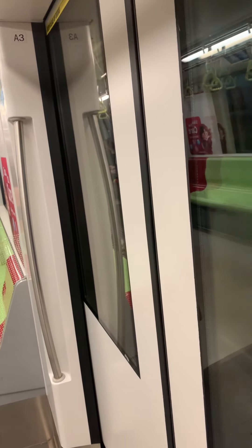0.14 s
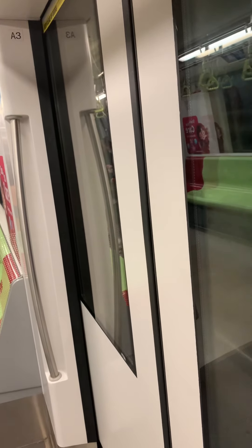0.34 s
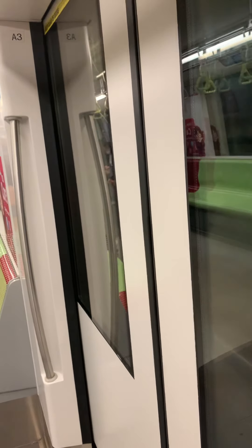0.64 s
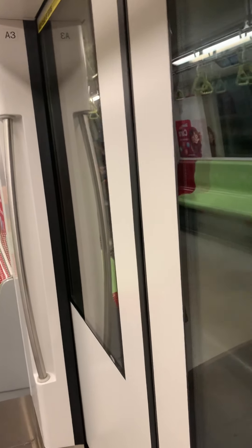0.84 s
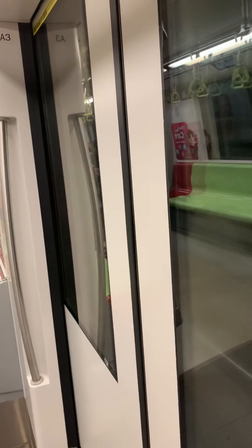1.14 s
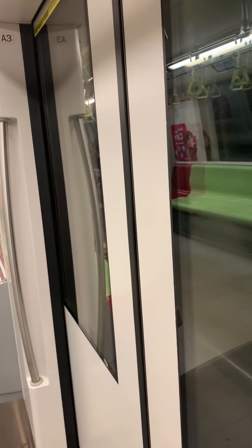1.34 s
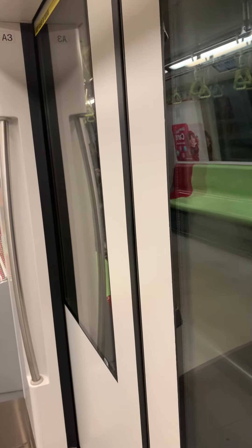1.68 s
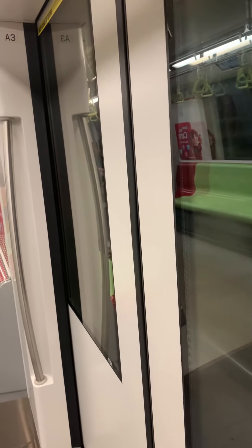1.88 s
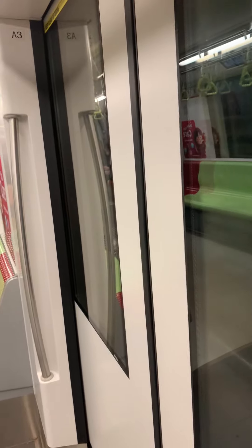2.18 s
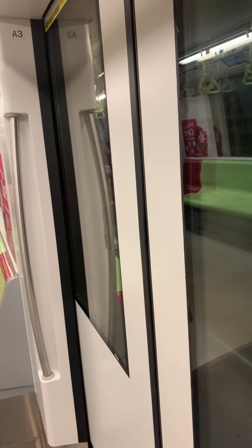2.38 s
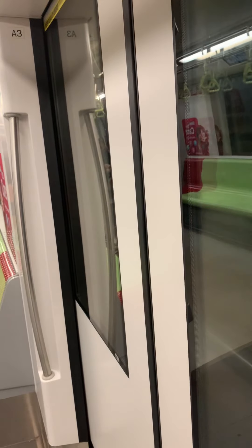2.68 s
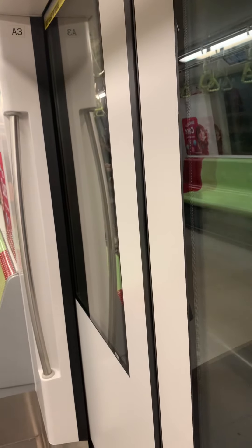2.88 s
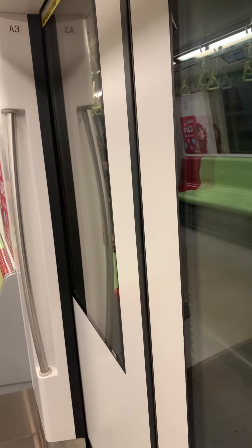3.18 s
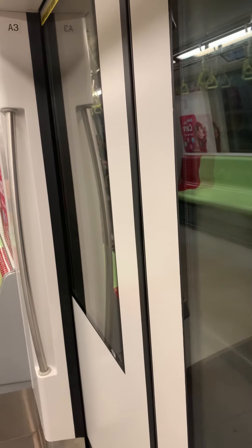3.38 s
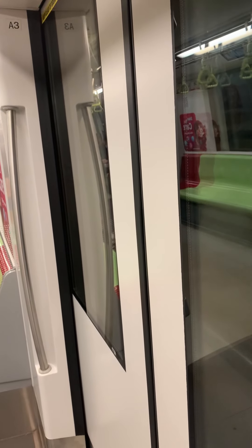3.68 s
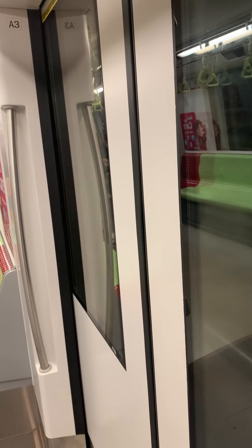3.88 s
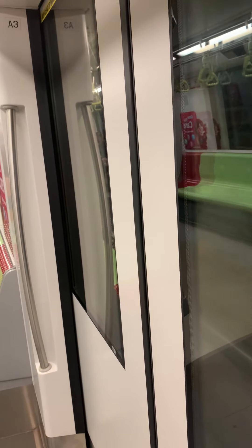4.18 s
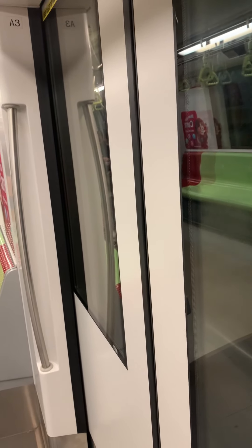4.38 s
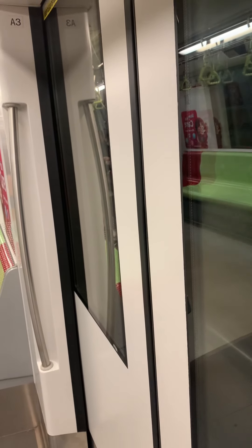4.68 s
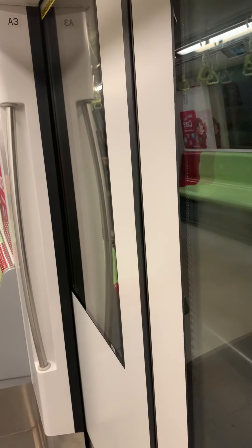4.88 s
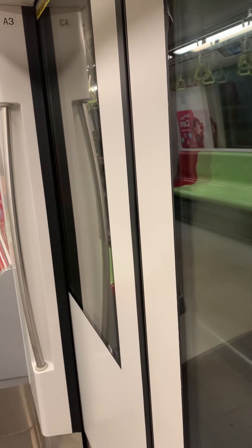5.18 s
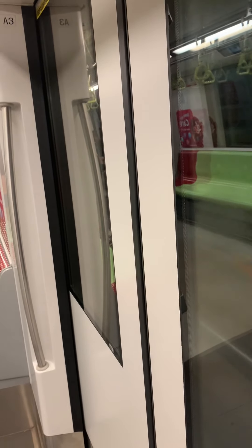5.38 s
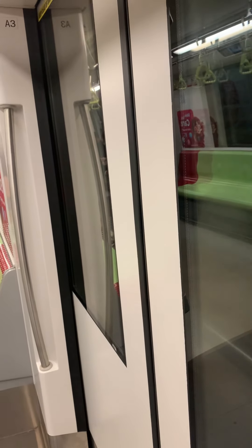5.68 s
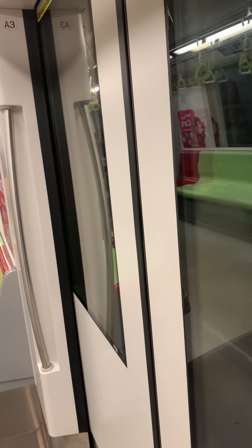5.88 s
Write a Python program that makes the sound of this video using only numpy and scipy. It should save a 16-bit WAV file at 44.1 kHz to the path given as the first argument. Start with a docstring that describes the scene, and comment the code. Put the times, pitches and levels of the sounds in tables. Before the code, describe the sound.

Inside a metro car in a tunnel, a low rolling roar swells into a loud, throbbing, howling drone, then eases with thin metallic squeals.

```python
"""Inside a metro car at steady speed in a tunnel, close to the doors, over a stretch of rough, rippled rail.
Ripples in the rail make the wheels howl on five wandering tones; a row of lines one sleeper rate apart is the
throbbing song of the rail. Rolling roar is coloured noise through floor, door panels and ringing wheels.
Hiss at the door seal surges with gusts, the door glass buzzes, ventilation hisses evenly and the body rumbles.
A flange scrapes and squeals late; the loudest peaks overload."""
import sys
import numpy as np
from scipy import signal
from scipy.fft import rfft, irfft, next_fast_len
from scipy.io import wavfile
from scipy.ndimage import uniform_filter1d, minimum_filter1d

SR = 44100
rng = np.random.default_rng(int(sys.argv[2]) if len(sys.argv) > 2 else 0)


def dump(signal):
    """Clip the signal to [-1, 1] and save it as 16-bit WAV at the path in sys.argv[1]."""
    limited = np.clip(np.atleast_2d(signal).T, -1, 1)
    pcm = np.round(limited * 32767).astype(np.int16)
    wavfile.write(sys.argv[1], SR, pcm)


N = 265911

# roughness of the rail under the car, relative to a nominal roughest rail: time_s, roughness_db
RAIL_ROUGHNESS = [(0, -15), (.3, -11.5), (.6, -7.5), (1.35, -5), (1.55, -2.5), (2.3, -1), (2.95, 0),
                  (3.6, 0), (4.2, -.5), (4.45, -2), (4.8, 0.5), (5.12, -1.5), (5.4, -5), (6.03, -9)]
# response of the ringing wheels: level_db on the roughest rail, db_per_db of roughness, db_per_db of gust
WHEEL_RESPONSE = (-27.5, 0.94, 0.58)


def undb(db):
    """Amplitude gain is ten to the power of a twentieth of the level in decibels."""
    return 10 ** (np.asarray(db) / 20)


def curves(table):
    """Linear interpolation turns each column after time_s into one value per sample."""
    time_s, *columns = np.transpose(table)
    return [np.interp(np.arange(N) / SR, time_s, column) for column in columns]


def walk(rate_hz):
    """Slow random fluctuation: held random steps, smoothed by two moving averages; spread near 1."""
    hold = int(SR / rate_hz)
    steps = np.repeat(rng.standard_normal(N // hold + 1), hold)
    smooth = uniform_filter1d(uniform_filter1d(steps, hold), hold)
    return 1.267 * smooth[:N]  # restores the spread lost by smoothing


def noise(colour, swell_db, flicker_db):
    """Spectral shaping of white noise, rms 1; third-octave bands swell together and flicker alone."""
    hz, db = np.transpose(colour)
    size = next_fast_len(N, True)
    octave = np.log2(np.arange(1, size // 2 + 2) * SR / size)
    gain = undb(np.interp(octave, np.log2(hz), db, -200, -200))  # silent outside the colour
    shaped = rfft(rng.standard_normal(size)) * gain
    swell = walk(2.856)
    out = 0
    for centre in np.arange(np.log2(hz[0]), np.log2(hz[-1]) + 1 / 3, 1 / 3):
        # triangular bands that overlap their neighbours
        share = np.clip(1 - 3 * np.abs(octave - centre), 0, 1)
        band = irfft(shaped * share, size)[:N]
        out = out + undb(swell_db * swell + flicker_db * walk(9.0)) * band
    return out / np.std(out)


def tone(hz, wander_hz, waver_db, rate_hz):
    """Integrated frequency gives the phase of a sine whose pitch wanders and whose level wavers about rms 1."""
    cycles = np.cumsum(hz + wander_hz * walk(rate_hz)) / SR
    phase = 2 * np.pi * (cycles + rng.random())
    return np.sqrt(2) * undb(waver_db * walk(rate_hz)) * np.sin(phase)


def ramp(start_s, length_s, attack_s, release_s):
    """Trapezoidal envelope: rises about start_s, holds, and falls back after about length_s."""
    hold_s = max(length_s - (attack_s + release_s) / 2, 0)
    corners_s = np.cumsum([start_s - attack_s / 2, attack_s, hold_s, release_s])
    return np.interp(np.arange(N) / SR, corners_s, [0, 1, 1, 0])


def swells(rows, attack_s, release_s):
    """Energy summation: the powers of start_s, length_s, level_db events add into one gain."""
    power = 0
    for start_s, length_s, level_db in rows:
        power = power + (undb(level_db) * ramp(start_s, length_s, attack_s, release_s)) ** 2
    return np.sqrt(power)


def gusts():
    """Unsteady flow: gusts of tunnel air against the car raise the level by some dB."""
    # start_s, length_s, rise_db
    gust_rows = [(0.653, 0.3, 5), (1.444, .15, 4.5), (1.81, 0.13, 1.5), (2.185, 0.26, 2.5), (4.66, 0.24, 2)]
    attack_s, release_s = .04, .094
    return sum(rise_db * ramp(start_s, length_s, attack_s, release_s)
               for start_s, length_s, rise_db in gust_rows)


def follow(response):
    """Excitation law: the level in dB is linear in the dB of rail roughness and of gust."""
    level_db, per_roughness, per_gust = response
    return level_db + per_roughness * curves(RAIL_ROUGHNESS)[0] + per_gust * gusts()


def rumble():
    """Low-frequency vibration of the car body: steady noise confined to the lowest bands."""
    # colour of the rumble: frequency_hz, density_db (dB per Hz)
    body_colour = [(12, -32), (18, -9), (39, -2), (50, -3.5), (62, -9), (100, -8.5), (150, -5.5), (200, -8),
                   (240, -36.5)]
    return undb(-33) * noise(body_colour, 0.35, 1.5)


def air():
    """Turbulent flow: tunnel air surges past the door seal over even ventilation hiss; the glass buzzes along."""
    # air flow past the door seal between gusts: time_s, level_db
    seal_flow = [(0, -63), (.3, -58), (.6, -51.5), (1.35, -49.5), (1.7, -44.5), (2.5, -46), (2.75, -42.5),
                 (3.5, -43), (4.2, -43.5), (4.55, -46.5), (5.12, -45.5), (5.3, -52.5), (6.03, -59.5)]
    # colours of the seal hiss, the door glass and the ventilation: frequency_hz, density_db (dB per Hz)
    seal_colour = [(2600, -23.5), (2950, -5.5), (3200, -5), (3710, -5), (3980, -10), (5820, -11),
                   (8000, -16.5), (9600, -18.5), (11000, -24.5), (12500, -34.5), (15700, -41.5)]
    glass_colour = [(1500, -28), (1700, -3.5), (1950, -1), (2200, 0), (2500, -4.5), (2900, -9.5),
                    (3300, -30)]
    vent_colour = [(1000, -34), (1700, -6), (2630, -14), (2960, -4.5), (3500, -14), (5780, -18),
                   (6760, -19), (10500, -26.5), (12500, -35.5), (15600, -43)]
    glass_db, vent_db = 2.5, -49.5

    rush_db = curves(seal_flow)[0] + gusts()
    wheel_db = follow(WHEEL_RESPONSE)
    hiss = undb(rush_db) * noise(seal_colour, .3, 1.0)
    # air and wheels both shake the glass, so it follows their mean level
    glass = undb((rush_db + wheel_db) / 2 + glass_db) * noise(glass_colour, 0.6, 0.55)
    ventilation = undb(vent_db) * noise(vent_colour, .2, .6)
    return hiss + glass + ventilation


def squeal():
    """Friction excitation: a rubbing flange hisses and rings one wheel mode on and off, sinking a little."""
    # squeals: start_s, length_s, level_db
    squeal_rows = [(4.7, .17, -59), (5.21, .2, -54), (5.65, .14, -53), (5.94, .15, -54)]
    # hiss of the rubbing flange: time_s, level_db
    scrape_level = [(3.6, -66), (4.4, -60), (5.1, -57), (5.3, -55.5), (6.03, -55)]
    # its colour: frequency_hz, density_db (dB per Hz)
    scrape_colour = [(4600, -26.5), (5000, -8.5), (5400, 5), (5850, -1.5), (6300, -27)]
    attack_s, release_s, faint_db = .06, .16, -4.5  # the faint ring is relative to the scrape
    mode_hz, sharp_hz, from_s, settle_s = 5399, 55, 4.3, .5

    since_s = np.maximum(np.arange(N) / SR - from_s, 0)
    scrape = undb(curves(scrape_level)[0])
    faint = np.clip(since_s / .1, 0, 1) * scrape * undb(faint_db)
    hz = mode_hz + sharp_hz * np.exp(-since_s / settle_s)
    level = np.hypot(swells(squeal_rows, attack_s, release_s), faint)
    ring = level * tone(hz, 3.0, 2.0, 30.0)
    return ring + scrape * noise(scrape_colour, .6, .9)


def rail_song():
    """Parametric modulation: rail stiffer over each sleeper splits its tone into lines one sleeper rate apart."""
    # level before the lines are weighted: time_s, level_db
    song_level = [(0, -44), (.7, -26.5), (2.2, -20.5), (3.15, -18.5), (3.6, -27), (4.2, -21.5), (4.6, -49),
                  (5.1, -19), (6.03, -26.5)]
    song_hz, sleeper_hz = 627.5, 27.9
    # the strongest pitch starts high and sinks from a moment on; a line spread_hz from it has half the amplitude
    strongest_hz, sinks_s, sink_hz_per_s, spread_hz = 646, 2.3, 27, 66.4

    centre_hz = strongest_hz - sink_hz_per_s * np.maximum(np.arange(N) / SR - sinks_s, 0)
    out = 0
    for k in range(-2, 5):
        hz = song_hz + k * sleeper_hz
        share = 1 / (1 + ((hz - centre_hz) / spread_hz) ** 2)
        out = out + share * tone(hz, 1.308, 2.3, 5.0)
    return undb(curves(song_level)[0]) * out


def rolling():
    """Structure-borne sound: rail roughness reaches the car by floor, door panels and ringing wheels."""
    # colours of the floor, the door panels and the wheels: frequency_hz, density_db (dB per Hz)
    floor_colour = [(130, -52), (160, -23), (195, -30.5), (215, -14), (245, -21.5), (285, -3), (330, -5.5),
                    (365, -3.5), (400, -4), (440, -8.5), (480, -26.5)]
    door_colour = [(400, -27), (450, -9), (500, -3.5), (560, -5), (590, 0.5), (660, -4.5), (760, -7.5),
                   (850, -10), (1000, -19), (1100, -39)]
    wheel_colour = [(900, -24.5), (960, -5), (1110, -5), (1300, -1.5), (1500, -8), (1700, -13), (1900, -32)]
    # level_db on the roughest rail, db_per_db of roughness, db_per_db of gust
    floor_response = (-15, 0.75, 0.1)
    door_response = (-13.5, 0.76, 0.22)

    floor = undb(follow(floor_response)) * noise(floor_colour, 0.51, 1.6)
    doors = undb(follow(door_response)) * noise(door_colour, 0.38, 1.5)
    wheels = undb(follow(WHEEL_RESPONSE)) * noise(wheel_colour, 0.31, 0.7)
    return floor + doors + wheels


def howl():
    """Periodic excitation: evenly spaced ripples under the wheels give nearly steady tones."""
    # the five tones: pitch_hz, wander_hz, hum_db (faint hum between stretches, on the roughest rail)
    howl_tones = [(227.2, 2.83, -30.5), (257.3, 2.15, -31), (310.7, 7.97, -26.5), (352.2, 7.0, -26.5),
                  (379, 2.4, -23)]
    # rippled stretches, one list for each tone: start_s, length_s, level_db
    ripple_rows = [
        [(2.2, 0.39, -28), (2.85, 0.78, -24.5), (4.15, 0.26, -25.5), (4.45, 0.12, -19.5), (4.7, 0.15, -23.5),
         (5.28, 0.47, -33.5)],
        [(1.42, 0.63, -18.5), (2.2, 0.32, -16.5), (2.65, 0.31, -22.5), (3.15, 0.49, -20), (3.9, 0.34, -17.5),
         (4.55, 0.26, -22), (5.3, .2, -23.5)],
        [(1.65, 0.16, -17.5), (2.15, 0.17, -15.5), (2.9, 0.17, -16.5), (4.0, 0.43, -20.5), (4.7, 0.39, -18),
         (5.15, 0.17, -18), (5.5, 0.26, -19), (5.85, .3, -17.5)],
        [(.4, 0.87, -24.5), (1.9, .45, -17.5), (2.95, 0.14, -15.5), (3.35, 0.22, -16.5), (3.9, 0.22, -16.5),
         (4.3, 0.21, -16), (5.0, 0.25, -20)],
        [(-.1, 0.9, -25.5), (1.25, .42, -21.5), (1.9, 0.6, -18.5), (2.4, 0.47, -13), (2.65, 0.81, -11.5),
         (3.9, 0.12, -23), (4.12, 0.4, -16.5), (5.0, 0.18, -15.5)],
    ]
    attack_s, release_s = 0.19, 0.17

    rough_db = curves(RAIL_ROUGHNESS)[0]
    out = 0
    for (pitch_hz, wander_hz, hum_db), rows in zip(howl_tones, ripple_rows):
        hum = undb(hum_db + rough_db)
        level = np.hypot(swells(rows, attack_s, release_s), hum)
        # the level wavers as the ripples change along the rail
        out = out + level * tone(pitch_hz, wander_hz, 1.74, 20.0)
    return out


def scene():
    """Superposition: the pressures of all sources add at a point by the doors."""
    return (rumble() + air() + squeal() + rail_song() + rolling() + howl())[None]


def record(dry):
    """Overload: a quick limiter takes part of each peak, the rest is clipped, then the top is cut."""
    gain_db, top_hz = -0.68, 15715
    threshold, limit_share, limit_s = .97, .64, .004

    loud = undb(gain_db) * dry[0]
    span = int(limit_s * SR)
    # running maximum of the magnitude, smoothed
    peak = uniform_filter1d(-minimum_filter1d(-np.abs(loud), span), span)
    limiter_gain = (threshold / np.maximum(peak, threshold)) ** limit_share
    clipped = np.clip(loud * limiter_gain, -1, 1)
    cut = signal.ellip(14, .01, 70, top_hz, fs=SR, output="sos")
    # the filter is already settled when the sound begins
    settled = signal.sosfilt_zi(cut) * clipped[0]
    return signal.sosfilt(cut, clipped, zi=settled)[0][None]


dry = scene()
out = record(dry)
dump(out)
```